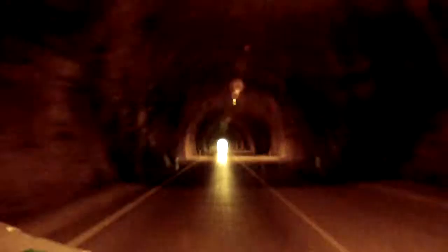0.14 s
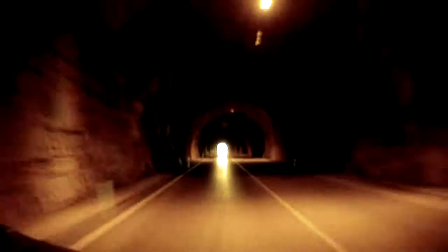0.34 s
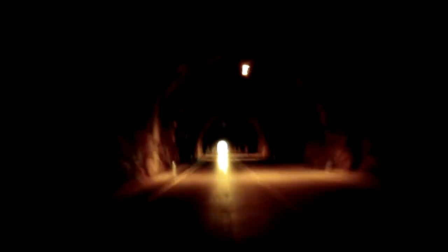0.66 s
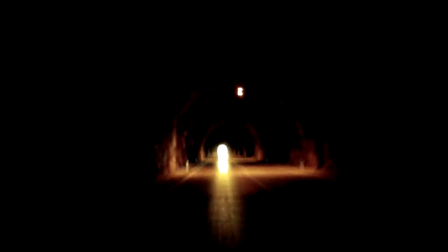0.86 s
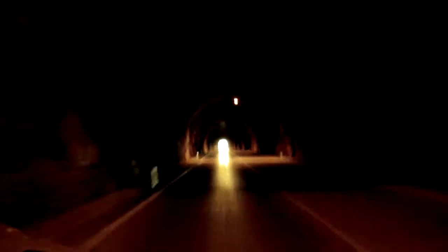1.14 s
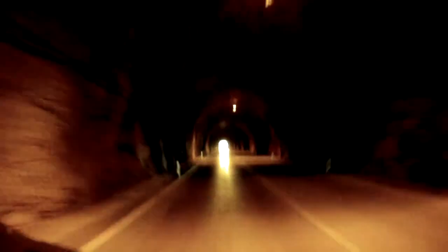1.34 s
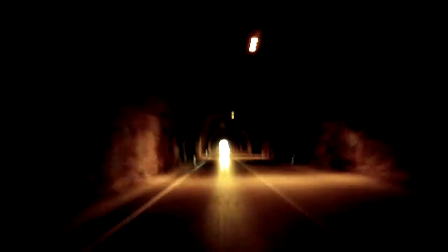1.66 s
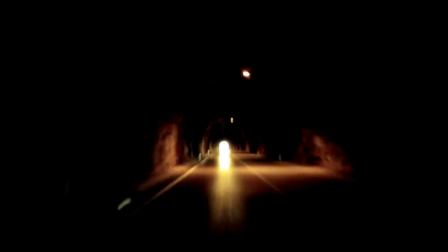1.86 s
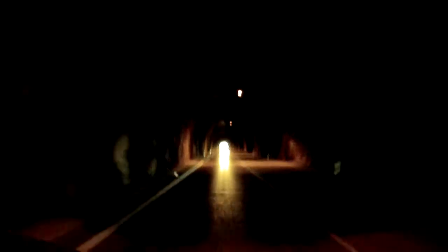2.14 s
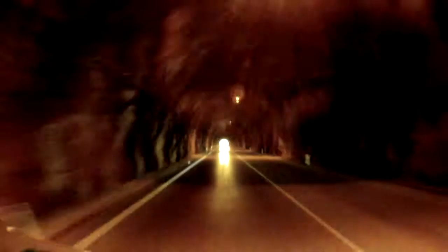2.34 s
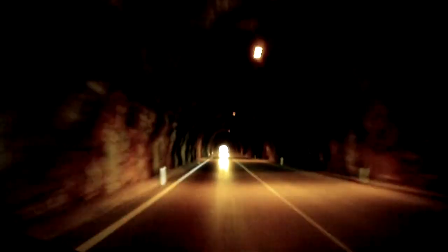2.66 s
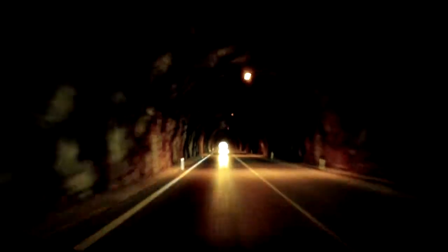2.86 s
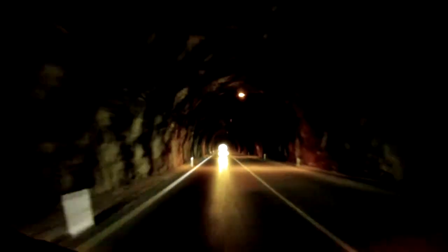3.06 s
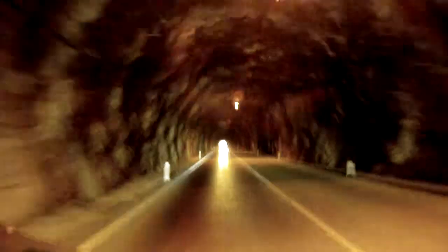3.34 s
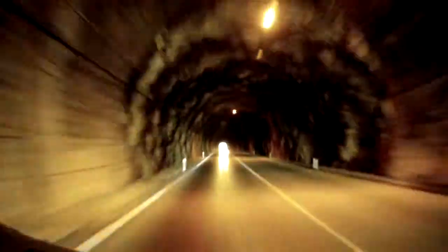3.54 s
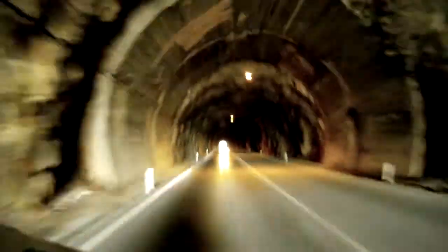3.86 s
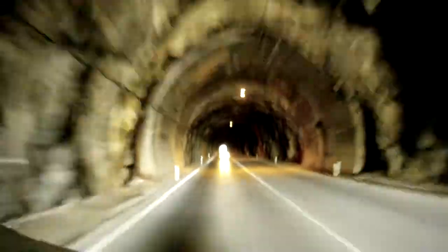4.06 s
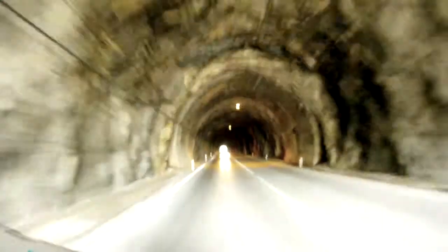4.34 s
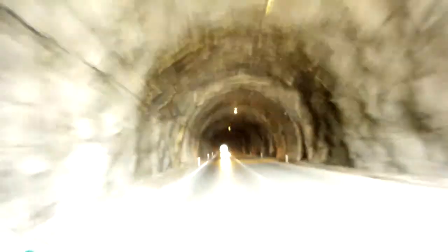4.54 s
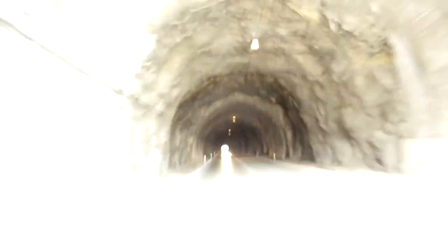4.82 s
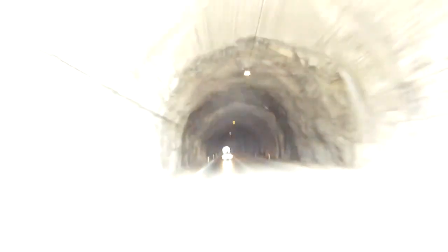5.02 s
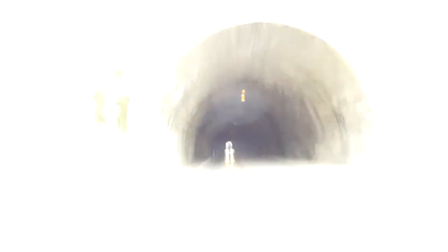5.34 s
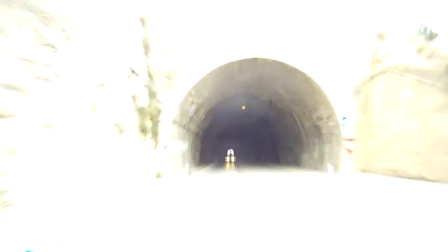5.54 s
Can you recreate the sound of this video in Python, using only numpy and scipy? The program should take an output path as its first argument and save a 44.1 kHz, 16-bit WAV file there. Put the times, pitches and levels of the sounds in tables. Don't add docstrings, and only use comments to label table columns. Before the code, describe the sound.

Heavy wind buffeting slaps a small camera microphone on a vehicle in a rock tunnel, over low engine drone, tyre roar and rattling, squeaking mount.

```python
import sys
import numpy as np
from scipy import signal
from scipy.fft import rfft, irfft, next_fast_len
from scipy.io import wavfile
from scipy.ndimage import uniform_filter1d

SR = 44100
rng = np.random.default_rng(int(sys.argv[2]) if len(sys.argv) > 2 else 0)


def volts(x):
    e = np.asarray(x, float) / 20
    return 10 ** e


def master_out(mix):
    frames = np.transpose(np.atleast_2d(mix))
    ceiling = np.clip(frames, -1, 1)
    pcm = np.round(ceiling * 32767).astype(np.int16)
    wavfile.write(sys.argv[1], SR, pcm)


N = 250929

# (multiple of the engine order, level [dB])
FAINT_ORDERS = [(.5, -30), (1.5, -28.5), (2.5, -31), (3, -39.5), (4, -35.5), (6, -46.5)]
# (time [s], frequency [Hz])
ENGINE_HZ = [(0, 63.5), (.4, 64), (1.5, 62.3), (2.8, 61.4), (4, 60), (4.5, 57), (5.3, 52.3), (5.7, 51.3)]
# (time [s], first order [dB], second order [dB])
DRONE_DB = [(0, -30, -25.5), (.3, -20, -20.5), (.75, -22.5, -26), (1.1, -16, -26), (1.4, -22, -33),
            (1.62, -35, -24), (1.9, -36, -21.5), (2.1, -23, -30), (2.5, -19, -26), (2.76, -44, -18),
            (3.1, -18, -23), (3.45, -26, -25.5), (3.9, -19, -16), (4.4, -30, -19.5), (4.75, -24, -25.5),
            (5.1, -30, -18), (5.4, -17, -18), (5.7, -33, -18.5)]
# (frequency [Hz], density [dB per Hz])
WIND_SPECTRUM = [(15, -7), (25, -3.5), (60, -9), (120, -8.5), (180, -14), (300, -21), (480, -22.5),
                 (700, -30.5), (900, -43.5), (1500, -61)]
# (frequency [Hz], density [dB per Hz])
ROAR_SPECTRUM = [(300, 1.5), (700, -4), (900, -1), (1100, 1.5), (1540, -1.5), (2150, 2), (2450, -3),
                 (2850, 2), (3300, -5.5), (4200, -12), (5000, -14.5), (5900, -21.5)]
# (time [s], buffeting [dB], road roughness [dB])
DRIVE_DB = [(0, -1.5, -1), (.4, -4.5, 4.5), (.52, 0.5, -3.5), (.72, -4, 0), (1.05, -1.5, 3.5),
            (1.32, -3.5, -1.5), (1.7, 2, 4), (1.92, 1, 0), (2.2, -1, 3), (2.55, -1, -4), (2.85, -1, 4.5),
            (3.15, -4, -5.5), (3.55, -0.5, 2.5), (3.92, -2, -1), (4.4, -2.5, -1.5), (4.85, -1.5, 0.5),
            (5.15, -1.5, -3.5), (5.7, -2, -1.5)]
# (time [s], push, pull just before it, gain drop [dB])
GUST_SLAPS = [(0.4377, 0.54, 0.57, -2), (.487, 0.65, 0.31, -3), (0.8534, .6, 0.22, -3),
              (0.9309, 0.99, 0.31, -10.5), (1.132, 0.78, -0.21, 3.5), (1.1394, 1, 0.43, -8.5),
              (1.2065, 0.59, 0.32, -3.5), (1.297, 0.72, 0.3, 0), (1.6145, -0.84, -0.2, -7.5),
              (1.809, 0.81, -0.046, 0.5), (1.9993, 1, 0.31, -6.5), (2.1504, 0.6, 0.33, -1.5),
              (2.185, -0.57, -0.0018, -1.5), (2.3284, 0.68, -0.026, -1.5), (2.528, 0.13, 0.74, -4.5),
              (2.6094, -0.046, 0.57, -6), (2.8353, 1, 0.0056, -25), (2.987, 0.4, -0.21, 5),
              (3.397, 0.94, 0.17, -11.5), (3.5404, 0.5, 0.44, -3.5), (3.5787, 0.68, 0.018, -3.5),
              (3.7912, 0.8, 0.69, -14), (4.1065, 1, -0.31, -5), (4.4034, 1, -0.038, -2),
              (4.7445, -0.69, -0.4, -3), (4.9199, 0.89, -0.038, -4), (4.938, 1, 0.62, -16),
              (5.2423, 0.29, 0.71, -11.5)]
# (time [s], peak [dB])
LONE_SQUEAKS = [(.149, -19.5), (.3187, -23), (.386, -29), (.6155, -34), (.7682, -33), (.8973, -25),
                (.9991, -27.5), (1.645, -23.5), (1.8911, -30), (2.138, -14.5), (2.189, -20.5), (2.391, -30),
                (2.4882, -30), (3.051, -32.5), (3.5, -17), (3.5516, -22), (3.6162, -30.5), (3.9185, -23),
                (4.0776, -25), (4.3076, -33), (4.4, -26), (4.4915, -24), (4.7935, -27), (5.0, -36.5),
                (5.0843, -31), (5.4076, -36), (5.435, -29), (5.4825, -34), (5.632, -29)]
# (time [s], peak [dB], frequency [Hz])
LONE_CHIRPS = [(.072, -33, 3450), (.172, -19.5, 3610), (.4365, -33.5, 3650), (.7772, -25, 3800),
               (1.0505, -26.5, 3490), (1.145, -30, 3880), (1.1833, -26.5, 3800), (1.4606, -22.5, 3250),
               (1.5713, -36, 3480), (1.671, -30, 3770), (1.9046, -28, 3790), (2.136, -35, 3800),
               (2.164, -28, 3770), (2.4074, -36, 3800), (2.4726, -29, 3470), (2.5215, -23.5, 3830),
               (2.715, -25, 3800), (3.3228, -33, 3500), (3.4273, -33, 3470), (3.524, -28, 3560),
               (3.6321, -33, 3760), (3.8373, -36.5, 3470), (4.0986, -32, 3500), (4.1587, -34, 3700),
               (4.3305, -37.5, 3700), (4.4044, -33, 3890), (4.6351, -24, 3540), (5.463, -25, 3800),
               (5.536, -27, 3600), (5.582, -31, 3840)]
# (time [s], knock [dB], weight [dB], squeak [dB])
FORE_KNOCKS = [(0.2468, -29, 0, -18), (0.3607, -30, -2, -13), (.41, -11, 2.5, -45), (0.7038, -26, 3, -19.5),
               (1.119, -13.5, 6, -17.5), (1.428, -28, -9, -19.5), (1.742, -15, 0, -19),
               (2.4403, -19.5, -2, -25), (2.689, -30, 0, -20.5), (3.4505, -23, -4, -24),
               (3.5233, -16.5, -6, -33), (3.9725, -24, 4, -18.5), (4.021, -16, -5, -21),
               (4.7796, -21.5, 0, -47), (4.881, -14.5, 5, -15.5), (4.9348, -22, 11, -50),
               (5.3752, -16.5, 0, -17.5), (5.4585, -9, -4, -20.5), (5.5057, -9, 1, -17),
               (5.53, -9.5, 4, -34)]
# (time [s], knock [dB], weight [dB], chirp [dB], chirp [Hz])
AFT_KNOCKS = [(.2785, -19, 3, -26, 3590), (.339, -28, 0, -28, 3780), (0.386, -14, 0, -16.5, 3520),
              (0.6389, -16.5, 3, -18.5, 3770), (0.924, -15.5, 2, -33.5, 3700), (1.3939, -18, -4, -32, 3600),
              (1.716, -20, -3, -25.5, 3700), (1.7675, -17.5, 3, -33, 3800), (2.11, -17.5, 11, -25, 3580),
              (2.2146, -23, 0, -21, 3700), (2.353, -33, 11, -27, 3700), (3.477, -27, 9, -30.5, 3860),
              (3.5781, -20, 9, -26, 3580), (3.891, -23, 6, -32, 3800), (3.9455, -28, -4, -29.5, 3800),
              (3.997, -17, -4, -25.5, 3910), (4.0483, -14.5, 2, -30, 3940), (4.8144, -19, 13, -29.5, 3660),
              (4.9096, -11, 6, -25.5, 3490), (5.32, -26, 1, -31, 3800), (5.4017, -12.5, 6, -31, 3720),
              (5.437, -11, -2, -23, 3790), (5.6334, -11.5, 3, -27, 3800)]
# (frequency [Hz], level [dB], t60 [s])
HOUSING_MODES = [(537, 1, 0.0087), (710, -1, 0.015), (1088, -4, 0.018), (1256, -7, 0.0062),
                 (1780, -4, 0.0069), (2366, 2.5, 0.007), (3000, -7, 0.017), (3800, -18.5, 0.031),
                 (4760, -32, 0.0038), (5700, -34, .005)]
# (time [s], peak [dB])
CLAMP_SLAM = (5.4828, -1.5)
# (frequency [Hz], level [dB], t60 [s])
CLAMP_MODES = [(540, 2.5, 0.0074), (960, -4, 0.013), (1710, -9, 0.013), (2440, -3, 0.021),
               (4700, -12, 0.0039)]
# (frequency [Hz], density [dB per Hz])
SIDE_SPECTRUM = [(18, -34), (30, 2), (211, -6), (1170, -18.5), (4420, -28), (6040, -34), (7430, -29),
                 (13200, -37), (15000, -41)]

SQUEAK_MS, CHIRP_MS, KNOCK_MS, LENGTH_SPREAD = 8.55, 8.34, 6.94, 0.21


def evened(x):
    return x / np.sqrt(np.mean(x ** 2) + 1e-20)


def add(mix, at_s, sound):
    part = mix[round(at_s * SR):][:len(sound)]
    part += sound[:len(part)]


def read(points, hz):
    f, value = np.transpose(points)
    return np.interp(np.log(hz + 1), np.log(f + 1), value)


def coloured(x, points):
    size = next_fast_len(N)
    gain = volts(read(points, np.fft.rfftfreq(size, 1 / SR)))
    return evened(irfft(rfft(x, size) * gain, size)[:N])


def wander(top_hz):
    size = next_fast_len(N)
    hz = np.fft.rfftfreq(size, 1 / SR)
    spectrum = rfft(rng.standard_normal(size)) / (1 + (hz / top_hz) ** 4)
    return evened(irfft(spectrum, size)[:N])


def curve(rows, column):
    rows = np.array(rows)
    return np.interp(np.arange(N) / SR, rows[:, 0], rows[:, column])


def varied(value, spread, count):
    return value * np.exp(spread * np.clip(rng.standard_normal(count), -2, 2))


def engine(waver_db=3, jitter=0.0111):
    turns = np.cumsum(curve(ENGINE_HZ, column=1) * (1 + jitter * wander(top_hz=7.25))) / SR
    out = np.zeros(N)
    for order, db in FAINT_ORDERS:
        level = volts(db + waver_db * wander(top_hz=3.6))
        out += level * np.sin(2 * np.pi * (order * turns + rng.random()))
    for order in (1, 2):
        level = volts(curve(DRONE_DB, column=order) + 1.47 * wander(top_hz=9.4))
        out += level * np.sin(2 * np.pi * order * turns)
    return np.sqrt(2) * out


def creaks(count=70, base_db=-39, spread_db=2.5, low_hz=2747, high_hz=4010):
    when, size, pitch = rng.random((count, 3)).T
    at_s = when * (N / SR - .03)
    level_db = base_db - spread_db * np.log(size + .05)
    hz = low_hz + (high_hz - low_hz) * pitch ** 1.5
    return np.column_stack([at_s, level_db, hz, varied(CHIRP_MS, 2 * LENGTH_SPREAD, count)])


def rubs(squeak_hz=2890, hz_spread=.004, squeak_lag_s=.0033, chirp_lead_s=.001):
    low = LONE_SQUEAKS + [(s + squeak_lag_s, db) for s, _, _, db in FORE_KNOCKS]
    high = LONE_CHIRPS + [(s - chirp_lead_s, db, hz) for s, _, _, db, hz in AFT_KNOCKS]
    low_hz = varied(squeak_hz, hz_spread, len(low))
    low = np.column_stack([low, low_hz, varied(SQUEAK_MS, LENGTH_SPREAD, len(low))])
    return low, np.column_stack([high, varied(CHIRP_MS, LENGTH_SPREAD, len(high))])


def squeaks(events, overtone_db, rough, glide, gain_db, twin):
    out, t = np.zeros(N), np.arange(0, .02, 1 / SR)
    for (s, db, hz, ms), tilt in zip(events, rng.uniform(-1.1, 1, len(events))):
        u = np.clip(1000 * t / ms, 0, 1)
        swell = np.sin(np.pi * u ** 0.63)
        turns = np.cumsum(hz * (1 + glide * tilt * (u - .5))) / SR
        grit = rough * evened(uniform_filter1d(rng.standard_normal(len(t)), size=40))
        wobble = rough * evened(uniform_filter1d(rng.standard_normal(len(t)), size=40))
        tone = np.sin(2 * np.pi * turns + wobble) + volts(overtone_db) * np.sin(4 * np.pi * turns)
        twin_ratio = 1 + 0.057 * np.sign(3700 - hz)
        tone += twin * np.sin(2 * np.pi * turns * twin_ratio)
        add(out, s - .001, volts(db + gain_db) * swell * (1 + grit) * tone)
    return out


def knocks(spread_db=1.5, gain_db=2, bounces_per_s=3500):
    out, t = np.zeros(N), np.arange(0, .03, 1 / SR)
    events = FORE_KNOCKS + AFT_KNOCKS
    for (s, db, weight_db, *_), ms in zip(events, varied(KNOCK_MS, LENGTH_SPREAD, len(events))):
        ring = np.zeros(len(t))
        for hz, level_db, t60_s in HOUSING_MODES:
            mode_db = level_db + weight_db * (hz < 1200) + spread_db * rng.standard_normal()
            mode_hz = hz * rng.uniform(0.9, 1.048)
            ring += volts(mode_db - 60 * t / t60_s) * np.sin(2 * np.pi * mode_hz * t)
        u = 1000 * t / ms
        bounces = (rng.random(len(t)) < bounces_per_s / SR) * rng.standard_normal(len(t))
        bounces *= (0.31 + 4 * u) * np.exp(-2.2 * u ** 1.34)
        first_contact = 0.18 * (t == 0)
        hit = signal.fftconvolve(bounces + first_contact, ring)[:len(t)]
        add(out, s, volts(db + gain_db) * hit / abs(hit).max())
    return out


def slam(rebound_s=0.00182, rebound_db=-0.5):
    out, t = np.zeros(N), np.arange(0, .03, 1 / SR)
    at_s, peak_db = CLAMP_SLAM
    ring = -sum(volts(db - 60 * t / t60_s) * np.sin(2 * np.pi * hz * t) for hz, db, t60_s in CLAMP_MODES)
    ring /= abs(ring).max()
    add(out, at_s, volts(peak_db) * ring)
    add(out, at_s + rebound_s, volts(peak_db + rebound_db) * ring)
    return out


def surge(gather_s=0.031, gather_db=4):
    t, out = np.arange(-.1, .004, 1 / SR), np.zeros(N)
    for s, push, *_ in GUST_SLAPS:
        add(out, s - .1, gather_db * abs(push) * np.exp(-(t / gather_s) ** 2))
    return out


def wind_and_roar(wind_db=-14, roar_db=-34.5, lumps_db=3.0, shared=0.16, flutter_db=2.0,
                  bite_db=0.57, bite_per_road_db=0.42):
    lumps, road_db = wander(top_hz=44.0), curve(DRIVE_DB, column=2)
    wind = coloured(rng.standard_normal(N) * volts(lumps_db * lumps), WIND_SPECTRUM)
    upper = signal.sosfiltfilt(signal.butter(2, 170, "high", fs=SR, output="sos"), wind)
    wind = wind + upper * (volts(bite_db + bite_per_road_db * road_db + surge()) - 1)
    stir_db = shared * lumps_db * lumps + flutter_db * wander(top_hz=45.0)
    roar = coloured(rng.standard_normal(N), ROAR_SPECTRUM) * volts(stir_db)
    return volts(wind_db + curve(DRIVE_DB, column=1)) * wind + volts(roar_db + road_db) * roar


def ducking(attack_s=0.0065, release_s=0.097):
    t, drop_db = np.arange(-.004, .6, 1 / SR) + .004, np.zeros(N)
    shape = (1 - np.exp(-t / attack_s)) * np.exp(-(t / release_s) ** 0.97)
    for s, _, _, db in GUST_SLAPS:
        add(drop_db, s - .003, db * shape / shape.max())
    return volts(drop_db)


def swamped(width_s=.0035, share=.75):
    t, out = np.arange(-.015, .015, 1 / SR), np.zeros(N)
    for s, *_ in GUST_SLAPS:
        add(out, s - .017, share * np.exp(-(t / width_s) ** 2 / 2))
    return 1 - np.clip(out, 0, 1)


def slaps(rise_s=.0009, fall_s=.0022, lead_s=.0036, pull_width_s=.0014):
    out, t = np.zeros(N), np.arange(-.01, .03, 1 / SR)
    push = np.where(t < 0, np.exp(-(t / rise_s) ** 2 / 2), np.exp(-(abs(t) / fall_s) ** 1.2))
    pull = np.exp(-((t + lead_s) / pull_width_s) ** 2 / 2)
    for s, push_level, pull_level, _ in GUST_SLAPS:
        add(out, s - .01, push_level * push - pull_level * pull)
    return out


def scene():
    bed = (engine() + wind_and_roar()) * ducking()
    bed = signal.sosfilt(signal.butter(3, 36, "high", fs=SR, output="sos"), bed)
    bed = 0.69 * np.tanh(bed / 0.72)
    rumble = signal.sosfiltfilt(signal.butter(2, 700, fs=SR, output="sos"), bed)
    bed -= (1 - swamped()) * rumble
    low_rubs, high_rubs = rubs()
    low_joint = squeaks(low_rubs, overtone_db=-26.0, rough=0.074, glide=0.062, gain_db=-0.7, twin=0.046)
    high_joint = squeaks(high_rubs, overtone_db=-40, rough=0.12, glide=0.041, gain_db=-2.5, twin=0.63)
    faint_slips = squeaks(creaks(), overtone_db=-40, rough=0.3, glide=0.1, gain_db=0.1, twin=0.32)
    rattle = low_joint + high_joint + knocks() + slam() + ducking() * faint_slips
    mix = signal.sosfilt(signal.butter(1, 8, "high", fs=SR, output="sos"), bed + slaps() + rattle)
    return np.tile(mix, (2, 1))


def roll_off(x):
    return signal.sosfilt(signal.butter(12, 16570, fs=SR, output="sos"), x)


def record(dry, converter_hz=12000, edge_hz=15450, side_db=-48.5, side_per_fall_db=1.5):
    coarse = signal.resample_poly(np.clip(dry[0], -1, 1), converter_hz // 300, SR // 300)
    held = signal.resample_poly(np.repeat(coarse, 4), 147, 160)
    held = np.pad(held, (0, N))[2:N + 2]
    band_limit = signal.firwin(255, edge_hz, window=("kaiser", 7), fs=SR)
    held = signal.oaconvolve(held, band_limit, "same")
    level = np.sqrt(abs(uniform_filter1d(held ** 2, size=1024)))
    gain_db = uniform_filter1d(20 * np.log10(ducking()), size=800)
    falling_db = np.clip(-441 * np.gradient(gain_db), 0, 9)
    side_gain = volts(side_db + side_per_fall_db * falling_db + 6.4 * wander(top_hz=30))
    side = side_gain * level * coloured(rng.standard_normal(N), SIDE_SPECTRUM)
    finished = np.clip([held + side, held - side], -1, 1)
    return roll_off(finished)


dry = scene()
out = record(dry)
master_out(out)
```